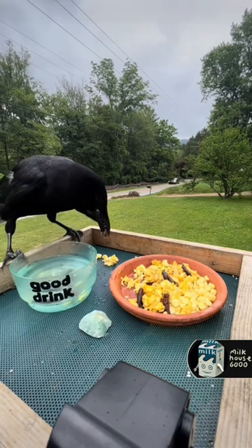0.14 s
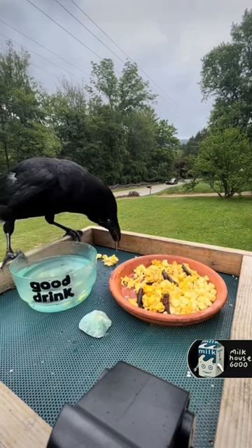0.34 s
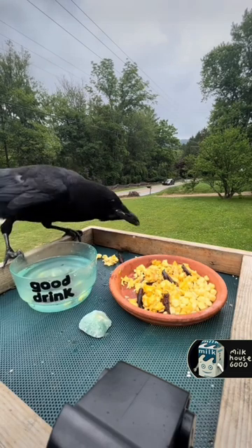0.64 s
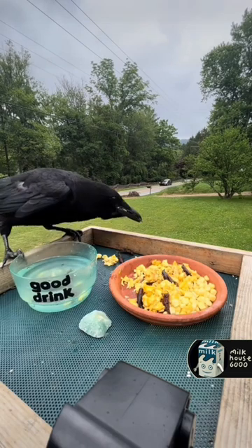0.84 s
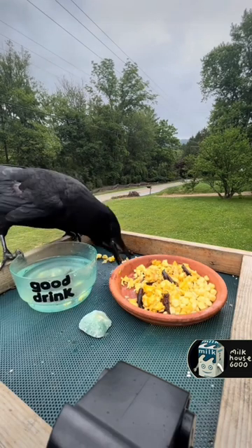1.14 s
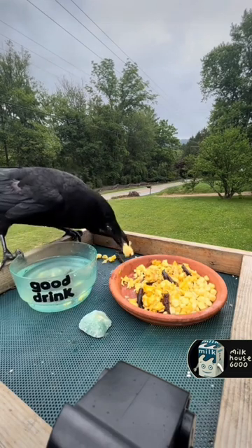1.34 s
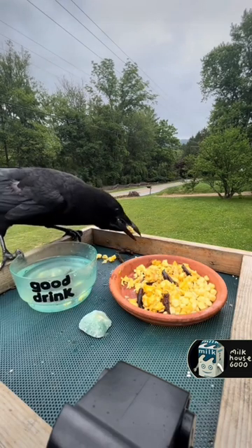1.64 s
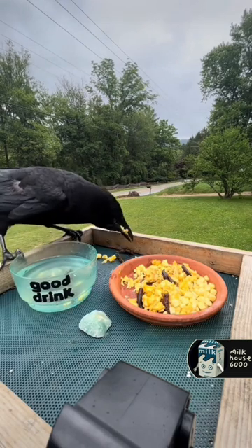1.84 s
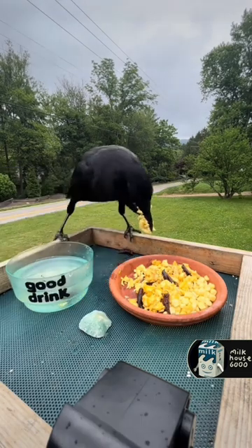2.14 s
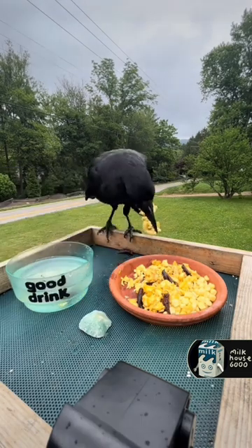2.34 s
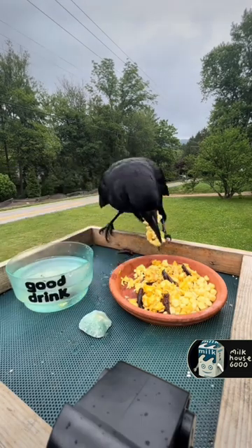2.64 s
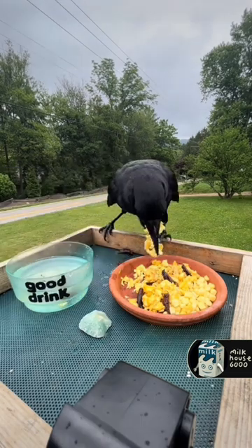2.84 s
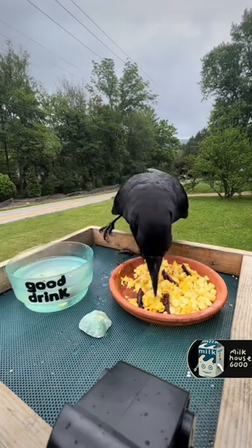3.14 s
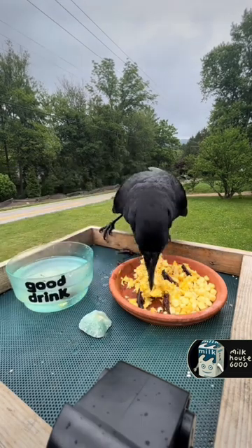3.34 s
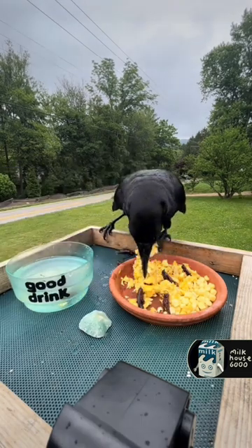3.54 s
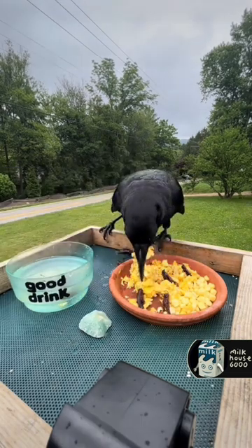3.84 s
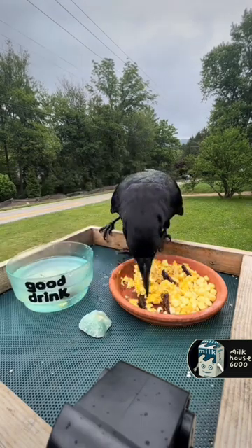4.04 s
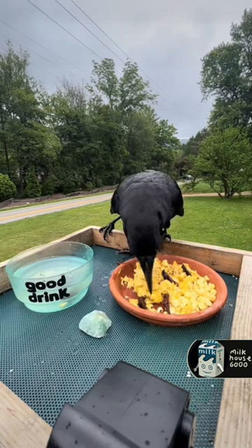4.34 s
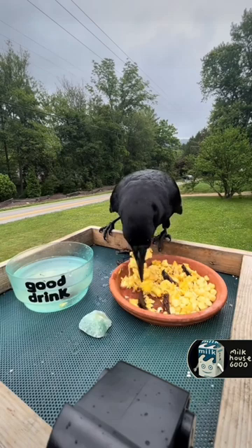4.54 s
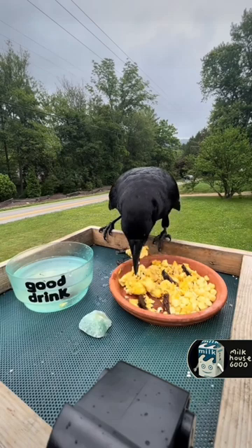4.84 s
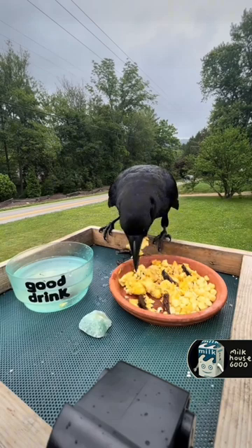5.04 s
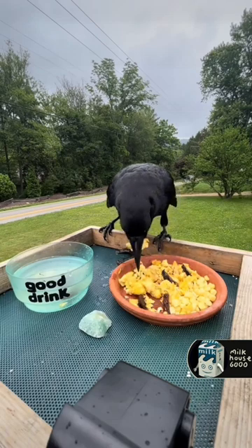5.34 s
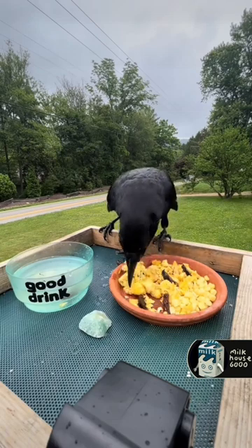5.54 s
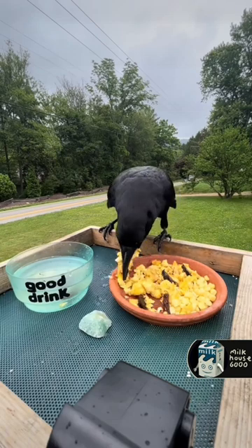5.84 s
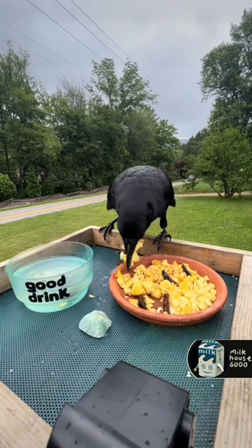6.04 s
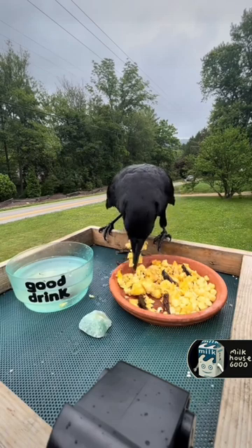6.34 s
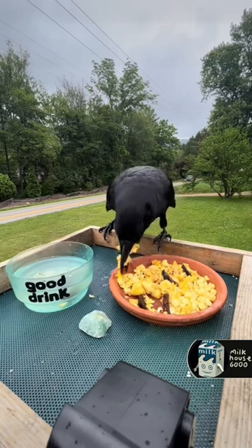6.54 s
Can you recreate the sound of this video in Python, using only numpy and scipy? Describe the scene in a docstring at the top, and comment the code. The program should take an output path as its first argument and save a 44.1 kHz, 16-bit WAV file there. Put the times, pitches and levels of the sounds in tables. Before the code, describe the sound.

Quiet outdoor hum with faint chirps, an abrupt burst of vehicle roar, small gritty pecks on a dish, and finally three loud, raspy crow caws close by.

```python
"""In a garden, a crow pecks at a wooden feeding tray; then three harsh caws sound close by, on the left.
Each caw is a syrinx whose two beating sides start rough, lock into a clear tone at the top of the pitch
arch and sink into a throbbing rasp. Pecks are gritty impulses that ring damped modes of tray and dish.
Scrapes and rustles are shaped noise, bird chirps gliding sines, the far engine a wavering drone.
A rush of road noise, an engine note under tyre roar, starts and stops abruptly."""
import sys
import numpy as np
from scipy import signal
from scipy.fft import rfft, irfft
from scipy.io import wavfile
from scipy.ndimage import uniform_filter1d

SR = 44100
rng = np.random.default_rng(int(sys.argv[2]) if len(sys.argv) > 2 else 0)


def waveform_to_disk(signal):
    """Save audio, clipped to [-1, 1], as 16-bit WAV at the path in sys.argv[1]."""
    frames = np.transpose(np.atleast_2d(signal))
    scaled = np.clip(frames, -1, 1) * 32767
    samples = np.round(scaled).astype(np.int16)
    wavfile.write(sys.argv[1], SR, samples)


N = 295029
T = np.arange(N) / SR


def undb(db):
    """Decibels are logarithmic: convert them to amplitude gain."""
    return 10 ** (np.asarray(db) / 20)


def unit(x):
    """Normalization: scale to rms 1."""
    return x / np.sqrt(np.mean(x ** 2) + 1e-20)


def follow(rows):
    """Linear interpolation: the columns of a time curve at every sample."""
    s, *columns = np.transpose(rows)
    return [np.interp(T, s, c) for c in columns]


def over_hz(points, hz):
    """Logarithmic frequency scale: join the points of a curve along it."""
    f, value = np.transpose(points)
    return np.interp(np.log(hz + 1), np.log(f), value)


def colour(x, points, size=2048):
    """Minimum phase: a causal filter built from its magnitude response by folding the cepstrum."""
    cepstrum = irfft(np.log(undb(over_hz(points, np.fft.rfftfreq(size, 1 / SR)))))
    cepstrum[1:size // 2] *= 2
    cepstrum[size // 2 + 1:] = 0
    return signal.fftconvolve(x, irfft(np.exp(rfft(cepstrum))))[:N]


def band(x, hz, kind, order=2):
    """Band limiting: a Butterworth filter, flat in its passband."""
    return signal.sosfilt(signal.butter(order, hz, kind, fs=SR, output="sos"), x)


def noise():
    """White noise: equal power at all frequencies."""
    return rng.standard_normal(N)


def wander(hz):
    """Random modulation: low-passed chance with rates up to hz, rms 1."""
    # the first second, where the filter settles, is dropped
    return unit(band(rng.standard_normal(N + SR), hz, "lowpass")[SR:])


def gate(start, end, fade):
    """Gating: on between two times, with linear ramps."""
    return np.clip(np.minimum(T - start, end - T) / fade + .5, 0, 1)


def rise(x):
    """Sigmoid transition: a smooth step from 0 to 1 around x = 0."""
    return .5 + .5 * np.tanh(x)


def steady(x, size=1300):
    """Level control: hold the short-term rms at 1."""
    return x / np.sqrt(np.abs(uniform_filter1d(x ** 2, size)) + 1e-12)


# side level against mid level in diffuse sound: pitch_hz [Hz], side_minus_mid_db [dB]
SIDE_WIDTH = [(60, -13.5), (230, -8), (440, 2.5), (860, 3), (1670, -2.5), (3250, -8), (9000, -4)]


def spread(mid, side):
    """Interchannel coherence: the channels are alike in the bass and unlike in the middle."""
    return mid + np.outer([1, -1], colour(side, SIDE_WIDTH))


def diffuse(points):
    """Diffuse field: coloured noise from all around, mid rms 1."""
    mid = unit(colour(noise(), points))
    side = unit(colour(noise(), points))
    return spread(mid, side)


def echoes(x, t60, delay, top_hz):
    """Scattering: decaying noise as an impulse response, independent in each channel."""
    t = T[:SR]
    tails = band(rng.standard_normal((2, SR)), top_hz, "lowpass")
    tails = tails * undb(-60 * t / t60) * (t > delay)
    return signal.fftconvolve(x[None], unit(tails) / np.sqrt(SR), axes=1)[:, :N]


# slow swell and ebb of the garden air, before the trims in garden():
# start_s [s], rumble_db [dB], middle_db [dB], hiss_db [dB]
AIR_LEVELS = [(0, -58.5, -71.5, -92), (.93, -55, -65.5, -83), (1.88, -50.5, -63, -108),
              (3.6, -51, -65, -101), (4.25, -49.5, -64, -78), (5.32, -48.5, -62.5, -68),
              (6.69, -57.5, -66.5, -78)]
# spectrum of the garden air: pitch_hz [Hz], level_db [dB, relative]
GARDEN_SPECTRUM = [(12, -48.5), (20, -8.5), (32, -18.5), (54, -10.5), (71, 0), (93, -5), (124, -5),
                   (184, -14.5), (252, -14.5), (421, -23), (487, -24.5), (774, -28.5), (1690, -27.5),
                   (2490, -37.5), (6770, -56.5), (8800, -85), (14900, -120)]
# spectrum of the high hiss, shared by rustling feathers: pitch_hz [Hz], level_db [dB, relative]
HISS_SPECTRUM = [(3000, 3.5), (5000, 4), (7000, 2), (9000, 2.5), (10500, -3.5), (13000, 3), (15000, -19)]


def garden(drone_hz=62, drone_db=-5, octave_db=-8, rumble_db=-3, middle_db=1, hiss_db=-1):
    """Superposition: a far engine's wavering drone, distant traffic and a soft high hiss."""
    low, middle, high = follow(AIR_LEVELS)
    phase = 2 * np.pi * np.cumsum(drone_hz * (1 + 0.03494 * wander(13.2))) / SR
    drone = undb(drone_db + 2 * wander(9.8)) * unit(np.sin(phase))
    octave = undb(octave_db + 4.1 * wander(12.8)) * unit(np.sin(2 * phase))
    air = diffuse(GARDEN_SPECTRUM)
    rumble = undb(rumble_db) * unit(band(air, 426, "lowpass", order=4))
    traffic = unit(band(air, 470, "highpass", order=4))
    bass = undb(low) * (drone + octave + rumble)
    traffic = undb(middle + middle_db + wander(5.9)) * traffic
    hiss = undb(high + hiss_db + 2 * wander(29)) * diffuse(HISS_SPECTRUM)
    return bass + traffic + hiss


# spectrum of the tyre roar: pitch_hz [Hz], level_db [dB, relative]
ROAD_SPECTRUM = [(20, -28), (60, -9), (130, -6), (190, -9), (250, -5.5), (380, -17), (480, -15.5),
                 (700, -18.5), (1170, -11.5), (1700, -20.5), (2400, -28.5), (4500, -34.5), (8000, -46),
                 (14500, -57)]
# the rush cuts in and out abruptly [s]
RUSH_START_S, RUSH_END_S = 0.96, 1.843
# the note falls from its approaching to its receding pitch around the moment of passing
APPROACH_HZ, RECEDE_HZ, PASSES_S, PASSING_S = 68.4, 57.5, 1.53, .17


def rush(engine_db=-44.0, tyre_db=-42.5):
    """Doppler shift: a passing vehicle's engine note sinks under broadband tyre roar."""
    hz = APPROACH_HZ + (RECEDE_HZ - APPROACH_HZ) * rise((T - PASSES_S) / PASSING_S)
    note = unit(np.sin(2 * np.pi * np.cumsum(hz * (1 + 0.029 * wander(8.2))) / SR))
    engine = undb(engine_db + 0.9 * wander(14)) * note
    roar = undb(tyre_db + 1.13 * wander(25)) * diffuse(ROAD_SPECTRUM)
    return engine + roar


# notes of small birds: start_s [s], length_s [s], pitch_hz [Hz, mid-note], level_db [dB, before gain_db]
CHIRP_NOTES = [(0, .05, 5010, -66), (.058, .06, 5040, -66), (0.139, .06, 5000, -69),
               (2.232, 0.15, 2600, -63), (2.667, 0.098, 2900, -62), (2.754, .073, 2370, -63),
               (3.33, .08, 3170, -67.5), (3.487, 0.046, 2330, -58.5), (3.816, 0.016, 5460, -59),
               (3.887, .017, 5400, -59), (4.255, 0.018, 5530, -59.5)]
# every chirp slides down, the short ones furthest: share of the pitch lost by a note of CHIRP_S
CHIRP_FALL, CHIRP_S = 0.12, 0.015


def small_birds(warble=0.014, gain_db=-5, trees_db=-6):
    """Frequency modulation: thin gliding, warbling whistles, scattered by the trees."""
    song, waver = np.zeros(N), 1 + warble * wander(170)
    for start, length, pitch, db in CHIRP_NOTES:
        u = np.linspace(0, 1, int(length * SR))  # progress through the note
        i = max(int(start * SR), 0)
        glide = 1 + CHIRP_FALL * CHIRP_S / length * (.5 - u)
        hz = pitch * glide * waver[i:i + len(u)]
        whistle = np.sin(np.pi * u) * np.sin(2 * np.pi * np.cumsum(hz) / SR)
        song[i:i + len(u)] += undb(db + gain_db) * whistle
    return song + undb(trees_db) * echoes(song, 0.17, 0.017, 7000)


# food pushed about: start_s [s], length_s [s], level_db [dB]
FOOD_SCRAPES = [(0.607, 0.048, -61), (1.079, 0.044, -37), (3.078, 0.067, -39.5)]
# spectrum of dragged food: pitch_hz [Hz], level_db [dB, relative]
FOOD_SPECTRUM = [(100, 15.5), (300, 7.5), (600, -4), (1100, 11), (1600, 7.5), (2300, -4), (4300, -3.5),
                 (6000, -14), (9000, -22), (15000, -57)]
# faint rustles as the bird shifts: start_s [s], length_s [s], level_db [dB]
FEATHER_RUSTLES = [(1.85, 0.069, -62), (2.3, 0.17, -75), (3.07, .08, -62), (4.1, 0.1, -65.5),
                   (4.46, 0.034, -68.5), (4.825, 0.079, -62), (5.03, 0.1, -64.5), (5.2, 0.19, -66),
                   (6.43, 0.072, -60)]


def scrapes():
    """Friction noise: beak through crumbly food and feathers, each firm at first, then letting go."""
    def strokes(rows):
        """Amplitude envelope: a quick rise and a slower fall for each stroke."""
        corners, heights = np.array([0, .15, .5, 1]), [0.011, 0.86, 0.48, 0.0086]
        return sum(undb(db) * np.interp(T, s + length * corners, heights) for s, length, db in rows)
    grain = undb(0.77 * wander(130))
    food = strokes(FOOD_SCRAPES) * diffuse(FOOD_SPECTRUM)
    feathers = strokes(FEATHER_RUSTLES) * diffuse(HISS_SPECTRUM)
    return grain * (food + feathers)


# blows of beak and claws: start_s [s], level_db [dB], brightness_db [dB], contact_decay_s [s],
# spot_pitch_hz [Hz], spot_level_db [dB, relative]
PECK_BLOWS = [(1.0775, -40.5, -6.5, 0.0074, 1660, 1.5), (1.92, -56.5, -3.5, 0.0033, 1660, 3),
              (2.093, -69.5, -14, .008, 1430, 16), (2.1108, -43.5, 0.5, 0.0027, 1468, 12),
              (2.205, -65.5, -20, .005, 1700, 7), (2.3013, -56, -1.5, 0.0019, 1650, 5.5),
              (2.4396, -52, 4, 0.0052, 4220, -3), (2.4884, -51.5, -1.5, 0.0024, 4000, 2.5),
              (2.595, -65, -12, 0.0018, 1650, 13.5), (2.6135, -71, -21, 0.0025, 1670, 9),
              (3.022, -62.5, 1.5, .0036, 2700, -5), (3.0702, -39, 3, .0017, 4800, 1),
              (4.0998, -41.5, -0.5, 0.0043, 1660, 2)]
# damped modes of tray and dish: pitch_hz [Hz], t60_s [s], level_db [dB, relative]
TRAY_MODES = [(611, 0.17, -4.5), (1220, 0.056, -6), (1590, 0.047, 0.5), (2380, 0.034, -14),
              (2800, 0.013, -11), (3260, 0.0033, 11.5), (4070, 0.0046, -2), (4840, 0.0045, 4),
              (7800, .02, -5), (8500, 0.019, -41)]


def pecks(crack_db=-1, knock_db=-5, clack_db=-3.0, tick_db=-10, spot_t60=0.027, rim_db=-8):
    """Modal excitation: short gritty contacts ring the tray, the dish and the spot that is struck."""
    out, t = np.zeros((2, N)), T[:SR // 5]
    body = sum(undb(db) * np.sin(2 * np.pi * hz * t) * undb(-60 * t / t60) for hz, t60, db in TRAY_MODES) / 20
    body[0] += undb(crack_db) * 2  # the contact itself, heard directly
    for start, db, bright_db, decay, spot_hz, spot_db in PECK_BLOWS:
        # food cushions the onset of the blow
        grit = rng.standard_normal((2, len(t))) * np.exp(-t / max(decay, 1e-4))
        push = grit * np.minimum(t / 0.00038, 1)
        hit = signal.fftconvolve(push, body[None], axes=1)[:, :len(t)]
        knock = band(hit, [400, 2000], "bandpass")
        clack = band(hit, [2800, 5400], "bandpass", order=3)
        tick = band(hit, [6000, 9500], "bandpass")
        # a harder contact trades low knock for high tick
        shares = undb([knock_db - bright_db, clack_db, tick_db + bright_db])
        # each band is levelled by its strength in the first few milliseconds
        hit = sum(share * p / p[:, :SR // 150].std(axis=1, keepdims=True)
                  for p, share in zip((knock, clack, tick), shares))
        ring = np.sin(2 * np.pi * spot_hz * t) * undb(-60 * t / spot_t60) * np.minimum(t / 0.003, 1)
        hit[0] += undb(spot_db) * 2 * ring  # in the mid only
        i = int(start * SR)
        out[:, i:i + len(t)] += undb(db) * hit
    # the tray floor and its rim throw each blow back
    return spread(*out) + undb(rim_db) * echoes(out[0], 0.075, 0.00081, 3300)


# caws: start_s [s], held_s [s], level_db [dB, relative], pitch_hz [Hz, before the contour],
# clear_until_s [s after the start]
CAW_CALLS = [(5.355, .332, -21, 630, .115), (5.997, 0.33, -23, 645.1, 0.12), (6.641, .33, -25.5, 645, .12)]
# loudness: a fast swell, a slow fade, a release that falls ever faster (40 dB in RELEASE_S)
ATTACK_S, ATTACK_DB, FADE_DB_PER_S, RELEASE_S = 0.02, 26.5, 13.5, .088
# the pitch scoops up from below, sags as the breath runs out and drops in the release
SCOOP_HZ, SCOOP_S, SAG_HZ_PER_S, DROP_HZ = 175, .032, 545, 90.54
# on top of that it arches where the bird pushes hardest
ARCH_HZ, ARCH_AT_S, ARCH_WIDTH_S = 52.03, .092, .058
# over the arch the syrinx locks into a clear tone: start, time to lock, time to unlock
CLEAR_FROM_S, LOCK_S, UNLOCK_S = .038, 0.013, 0.011
# roughness (0-1) before, in and after the clear part
ROUGH_START, ROUGH_CLEAR, ROUGH_RASP = 0.907, .12, 0.57
# the throb slows and deepens during the caw: mean rates, depths (0-1, halved in the clear part), times
THROB_FAST_HZ, THROB_SLOW_HZ, THROB_SHALLOW, THROB_DEEP = 99.67, 60.58, 0.067, 0.44
SLOWING_FROM_S, SLOWING_S = .14, .13


def caw_controls():
    """Motor gesture: one course of effort, pressing, slackness, pitch, roughness and throb for every caw."""
    rows = np.array(CAW_CALLS)
    # each caw takes over the controls 50 ms before it starts
    current = np.clip(np.searchsorted(rows[:, 0] - .05, T) - 1, 0, None)
    start, held, db, pitch, clear_until = rows[current].T
    age = np.clip(T - start, 0, .5)
    release = np.maximum(age - held, 0) / RELEASE_S
    swell_db = ATTACK_DB * np.minimum(age / ATTACK_S - 1, 0)
    release_db = -40 * release ** 2
    effort = undb(db + swell_db - FADE_DB_PER_S * age + release_db) * (T > start)
    scoop = SCOOP_HZ * np.exp(-(age / SCOOP_S) ** 2)
    arch = ARCH_HZ * np.exp(-((age - ARCH_AT_S) / ARCH_WIDTH_S) ** 2)
    drop = DROP_HZ * np.minimum(release, 1) ** 2
    hz = pitch - scoop + arch - SAG_HZ_PER_S * age - drop
    locked = rise((age - CLEAR_FROM_S) / LOCK_S)
    unlocked = rise((age - clear_until) / UNLOCK_S)
    clear = locked * (1 - unlocked)
    rough = ROUGH_START * (1 - locked) + ROUGH_CLEAR * clear + ROUGH_RASP * unlocked
    slack = np.clip((age - SLOWING_FROM_S) / SLOWING_S, 0, 1)
    depth = (THROB_SHALLOW + (THROB_DEEP - THROB_SHALLOW) * slack) * (1 - .5 * clear)
    # half pressed before locking, fully pressed while clear
    pressed = (1 - unlocked) * (1 + locked) / 2
    throb_hz = THROB_FAST_HZ + (THROB_SLOW_HZ - THROB_FAST_HZ) * slack
    return effort, pressed, slack, hz, rough, depth, throb_hz


def syrinx(hz, slack, rough, depth, throb_hz, jitter=0.068, swing=0.104, shimmer=0.24,
           flutter_hz=230, third_db=3.5, second_db=-9, sideband_db=-7, count=26):
    """Beating oscillators: harmonics shaken by a slower beat; returns the voice and its breathy buzz."""
    # the two sides of the syrinx beat against each other, moving both pitch and loudness
    gap = 2 * np.pi * np.cumsum(throb_hz * (1 + .09 * wander(49.5))) / SR
    beat = np.cos(gap)
    cycles = np.cumsum(hz * (1 + 0.00816 * wander(96.0) + swing * rough * beat)) / SR
    # the slower jitter of the cycle is strongest in the troughs of the beat
    slow_jitter = jitter * rough * (1 - .5 * beat) * wander(flutter_hz)
    phase = 2 * np.pi * (cycles + slow_jitter + 0.018 * rough * wander(900))
    pulses = sum(np.cos(k * phase) for k in range(1, count + 1))
    # as the pitch sinks, the throat stays tuned to the third harmonic
    third = (undb(third_db * np.clip((600 - hz) / 70, 0, 1)) - 1) * np.cos(3 * phase)
    # the slacker side runs one beat rate lower and smears the fundamental into a band
    second = undb(second_db) * sum(np.cos(k * (phase - gap)) for k in range(1, 5))
    sidebands = undb(sideband_db) * 2 * np.sin(phase) * np.sin(gap)
    # late in the caw the slacker side takes over most of the fundamental
    handover = .72 * slack ** 2 * (np.cos(phase - gap) - np.cos(phase))
    throb = 1 + np.clip(depth, 0, .95) * beat
    voice = (pulses + third + handover) * np.exp(shimmer * rough * wander(300)) * throb
    voice = voice + 0.98 * rough * (second + sidebands)
    # little air escapes while the voice is clear
    air = (.12 + .65 * rough) * noise() * (1 + .5 * np.cos(phase))
    # while rough but not yet slack, some harmonics keep an even course and only flutter in loudness
    course = 2 * np.pi * np.cumsum(hz) / SR
    even = unit(sum(np.cos(k * course) for k in range(1, count + 1)))
    strands = even * wander(98) * 2 * rough * (1 - 0.8 * slack)
    return voice, (unit(pulses) + air + strands) * throb ** 0.37


# level difference of the caws between channels: pitch_hz [Hz], left_minus_right_db [dB]
CAW_LEVEL_DIFFERENCE = [(150, -4), (300, -12), (560, -8.5), (850, 9), (1250, 14), (1850, 11.5), (2400, 3),
                        (3400, 0.5), (4400, -1), (5600, 6.5), (7000, 0)]
# phase difference of the caws between channels: pitch_hz [Hz], left_lead_rad [rad]
CAW_PHASE_LEAD = [(280, -0.5), (450, -2), (900, -2), (1950, -2.5), (2200, -7), (6000, -5.5)]


def ports(x):
    """Interchannel cues: level and phase differences by frequency, split evenly over left and right."""
    fine = np.fft.rfftfreq(2 * N, 1 / SR)
    level, lead = over_hz(CAW_LEVEL_DIFFERENCE, fine), over_hz(CAW_PHASE_LEAD, fine)
    half = undb(level / 2) * np.exp(.5j * lead)
    return irfft(rfft(x, 2 * N) * [half, 1 / half])[:, :N]


# response of throat and open beak to the voice: pitch_hz [Hz], level_db [dB, relative]
THROAT_RESPONSE = [(180, -32), (340, -23), (540, -15.5), (800, -18), (1000, -11), (1250, 0), (1500, 1),
                   (1900, -5), (2200, -12), (2600, -17), (3500, -38), (6000, -31), (8000, -43.5),
                   (14000, -85)]
# response of throat and open beak to the rasp: pitch_hz [Hz], level_db [dB, relative]
RASP_RESPONSE = [(2000, -8.5), (2450, 1.5), (3050, -2.5), (3450, 4), (3900, 0), (4400, 0.5), (5100, -4.5),
                 (6000, -0.5), (7000, -7.5), (8200, -23), (9000, -10), (10500, -30.5), (12500, -18),
                 (15000, -43)]
# narrow windpipe resonances that sharpen the rasp: pitch_hz [Hz], width_hz [Hz], level_db [dB, relative]
WINDPIPE_RESONANCES = [(3020, 72, -2), (3440, 180, -7.5), (4450, 410, -0.5), (5830, 250, 1.5)]
# the lone opening pulse over the caw's level, and the gain of a fully pressed voice
OPENING_DB, PRESSED_DB = 22.5, 3


def crow(voice_db=3, rasp_db=-6, near_db=-14, scatter_db=-8, far_db=-38):
    """Source and filter: the syrinx through throat and beak, with reflections from tray and trees."""
    effort, pressed, slack, hz, rough, depth, throb_hz = caw_controls()
    pulses, buzz = syrinx(hz, slack, rough, depth, throb_hz)
    buzz = buzz + sum(undb(db) * band(buzz, [f - width / 2, f + width / 2], "bandpass", order=1)
                      for f, width, db in WINDPIPE_RESONANCES)
    rasp = undb(rasp_db) * effort * steady(colour(buzz, RASP_RESPONSE))
    voice = undb(voice_db + PRESSED_DB * pressed) * effort * steady(colour(pulses, THROAT_RESPONSE))
    call = voice + rasp
    for start, _, db, _, _ in CAW_CALLS:
        # the voice catches only a moment after the opening pulse
        call *= 1 - gate(start - .04, start + 0.0046, 0.0088)
        pulse = undb(db + OPENING_DB) * signal.unit_impulse(N, int(start * SR))
        call += colour(pulse, THROAT_RESPONSE) * 2
    # the short waves of the rasp scatter most from dishes and tray rim
    near = undb(near_db) * echoes(call, 0.07, 0.00077, 2300)
    near = near + undb(scatter_db) * echoes(rasp, 0.15, 0.0019, 9500)
    far = undb(far_db) * echoes(call, 1.0, 0.031, 6100)
    return ports(call) + near + far


def scene():
    """Superposition: garden air that gives way to the rush while it sounds, with tray, birds and crow on top."""
    quiet = 1 - gate(RUSH_START_S - .012, RUSH_END_S + 0.018, 0.0086)
    outdoors = quiet * garden() + gate(RUSH_START_S, RUSH_END_S, 0.015) * rush()
    lean_db = -1.0  # left minus right
    lean = undb([[lean_db / 2], [-lean_db / 2]])
    return (outdoors + pecks() + scrapes()) * lean + small_birds() + crow()


TOP_HZ = 15700


def record(dry):
    """Band limiting: a steep elliptic low-pass removes the extreme treble."""
    return signal.sosfilt(signal.ellip(8, .2, 70, TOP_HZ, fs=SR, output="sos"), dry)


dry = scene()
out = record(dry)
waveform_to_disk(out)
```